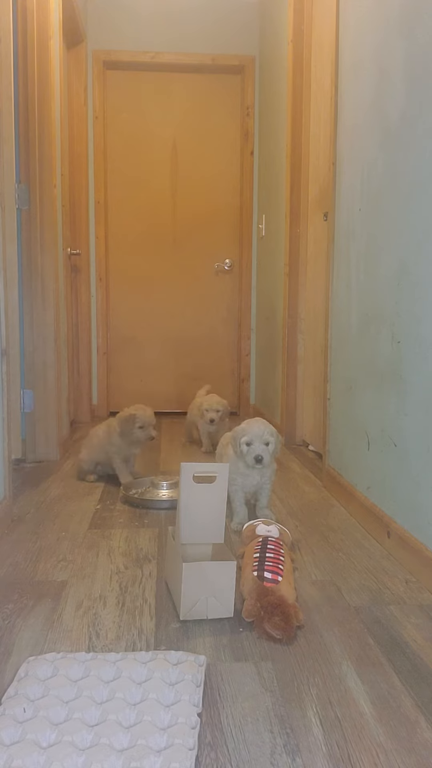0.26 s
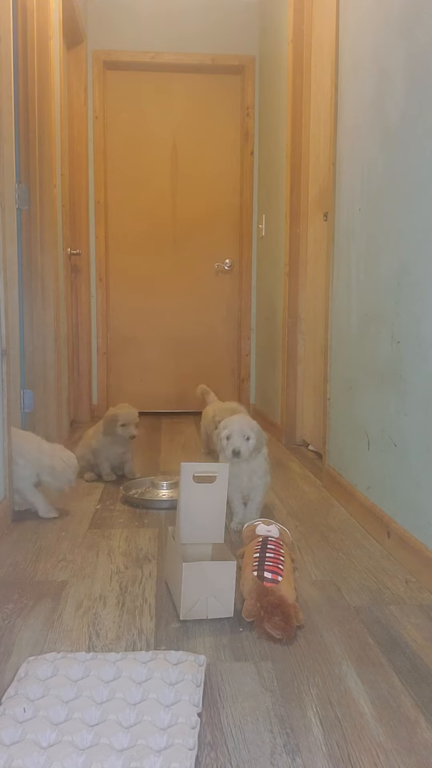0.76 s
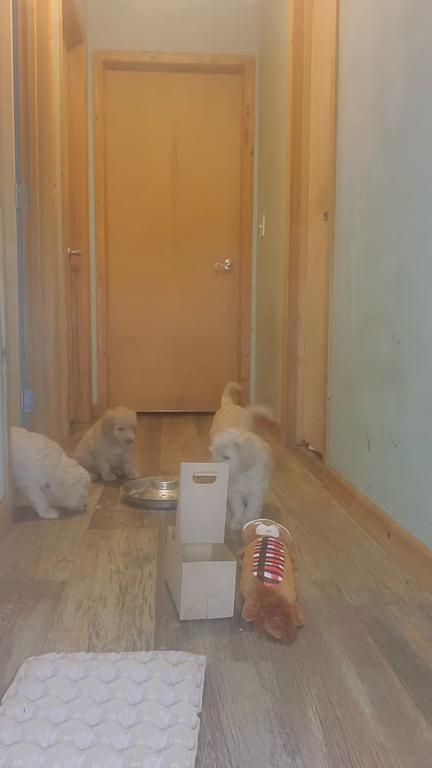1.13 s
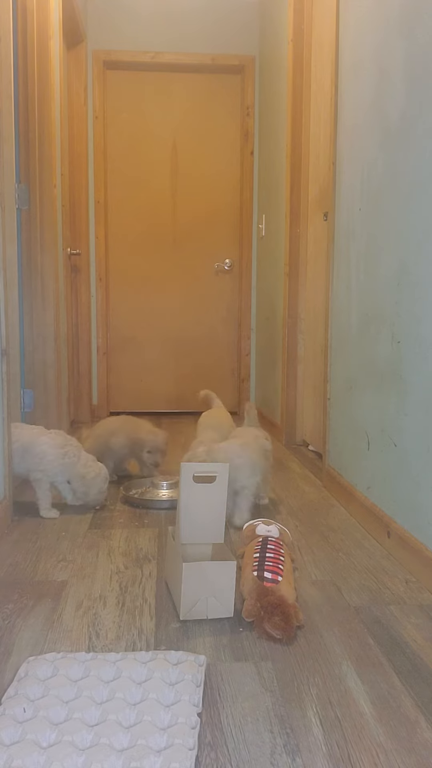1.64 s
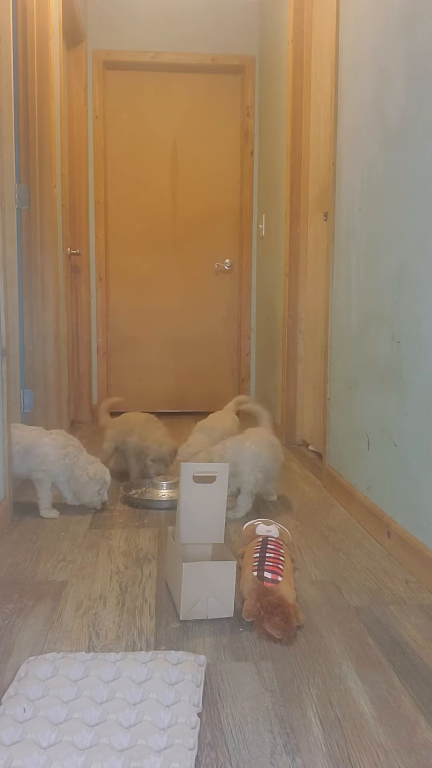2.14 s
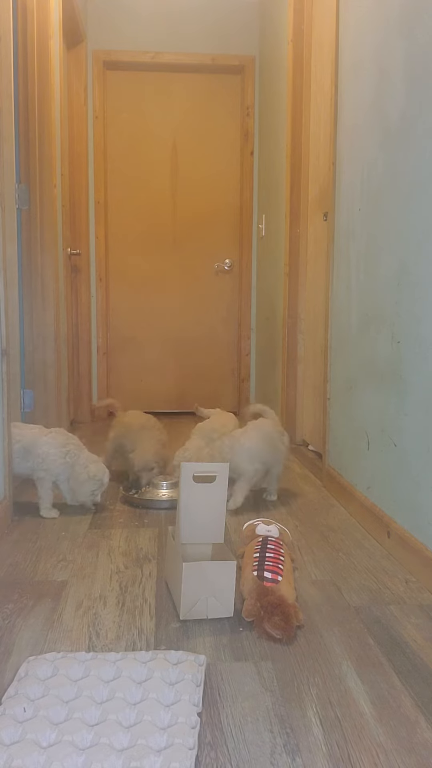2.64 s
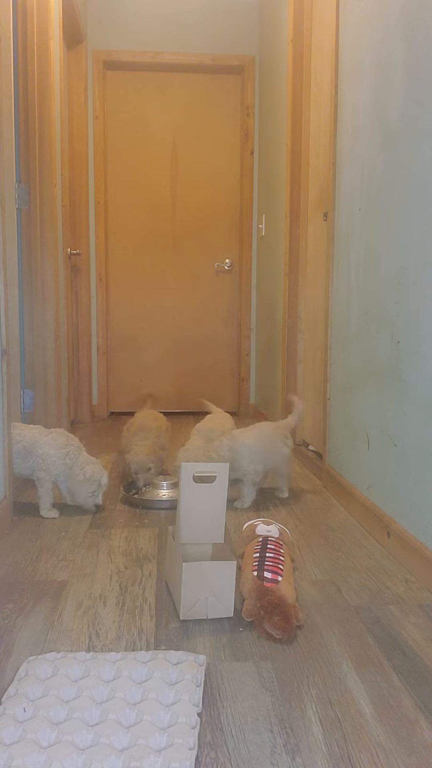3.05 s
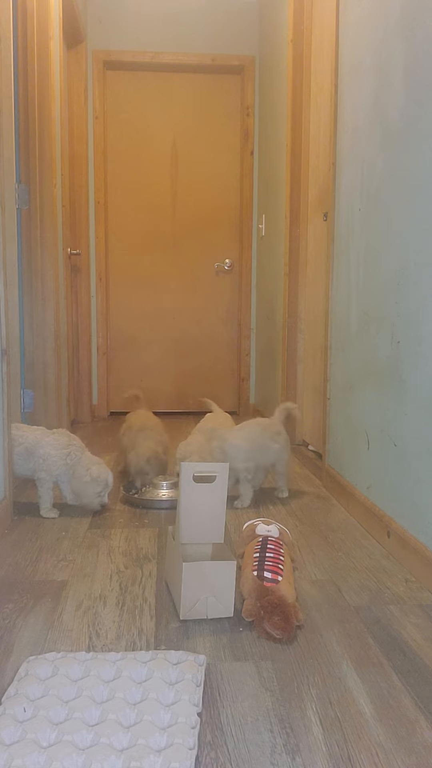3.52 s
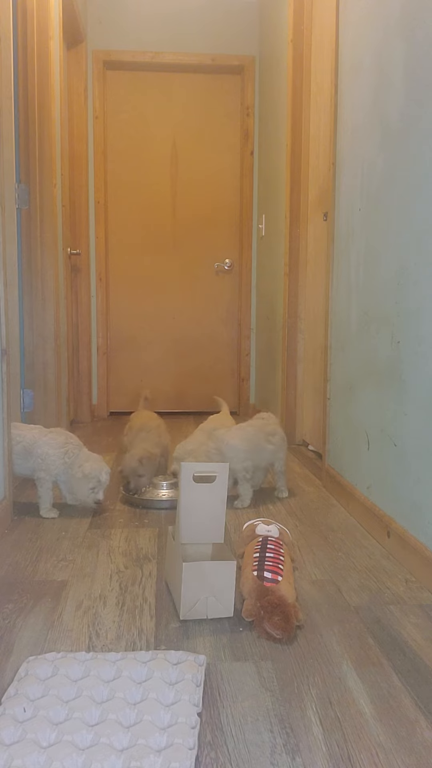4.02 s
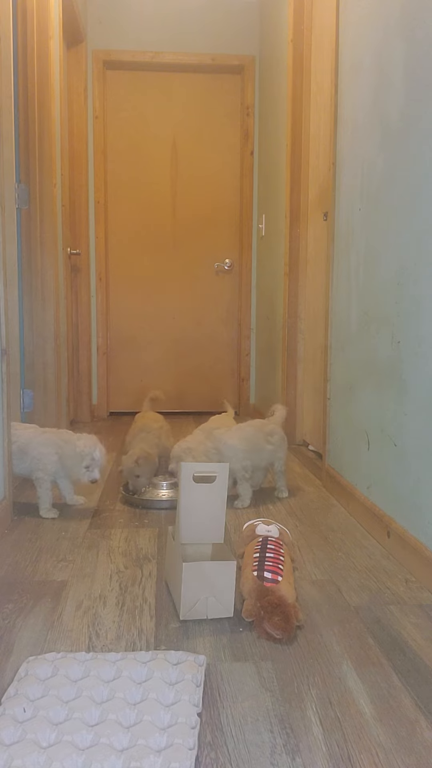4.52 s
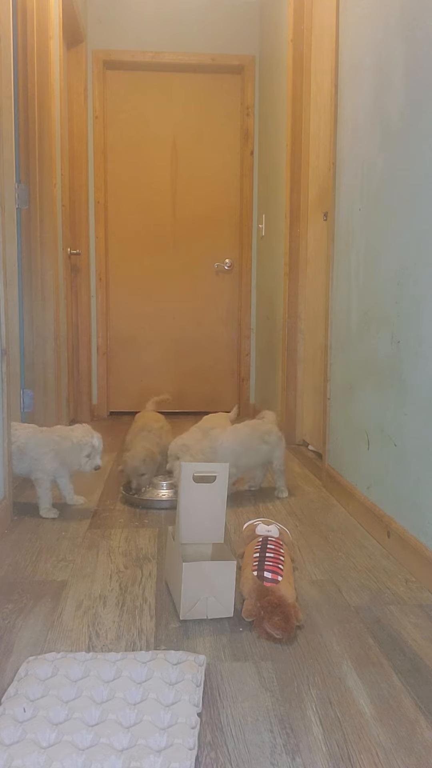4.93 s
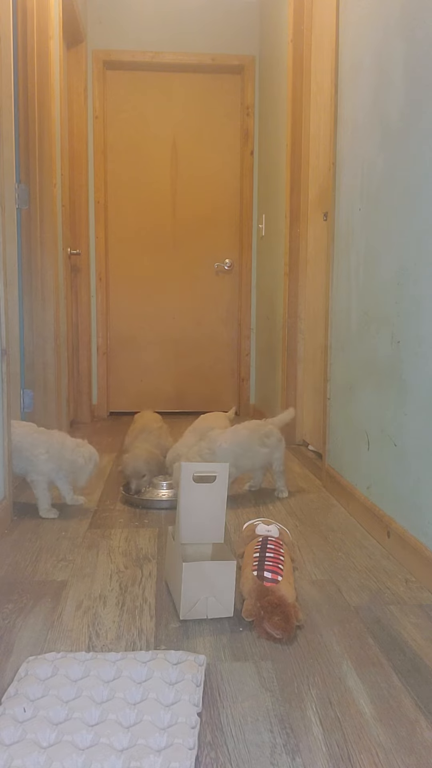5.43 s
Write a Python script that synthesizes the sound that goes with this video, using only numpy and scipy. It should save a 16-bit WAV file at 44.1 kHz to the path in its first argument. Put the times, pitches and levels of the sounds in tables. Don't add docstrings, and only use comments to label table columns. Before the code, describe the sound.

Indoors in a bare hallway, a low hum pulses slowly under soft paw brushing and tiny claw ticks. About a second in, one puppy gives a short, hollow bark with a brief echo. Kibble cracks follow, sparse at first, then denser and louder past four seconds with sharp clinks from a steel bowl. A stereo microphone stands close to the floor and the eating.

```python
import sys
import numpy as np
from scipy import signal
from scipy.fft import rfft, irfft
from scipy.io import wavfile

SR = 44100
rng = np.random.default_rng(int(sys.argv[2]) if len(sys.argv) > 2 else 0)


def transcribe(signal):
    frames = np.atleast_2d(signal).T
    limited = np.clip(frames, -1, 1)
    pcm = np.round(limited * 32767).astype(np.int16)
    wavfile.write(sys.argv[1], SR, pcm)


def convert_level_to_amplitude(level_db):
    exponent = np.asarray(level_db, float) / 20
    return 10 ** exponent


N = 250047

# start in seconds, bite level in dB,
# hardness in dB (crackle), weight in dB (knock and thud).
KIBBLE = [(2.4941, -36.5, -25.5, -9.5), (2.5749, -28.5, -14, -14.5), (2.592, -35, -14, -21),
          (3.2543, -41.5, -13.5, -5.5), (3.2847, -43, -10, -5), (3.3229, -17.5, -26.5, -19.5),
          (4.0893, -34.5, -28, -13.5), (4.1658, -7, -13, -25), (4.1713, -24.5, -18, -21),
          (4.3877, -10.5, -8.5, -17.5), (4.3914, -24, -9, -9), (4.5414, -27, -17, -10),
          (4.7059, -20.5, 0, -27.5), (4.8676, -36, -14.5, -20), (4.9294, -36.5, -20, -22),
          (5.077, -35.5, -21, -12.5), (5.248, -29, -17, -13), (5.29, -40.5, -23, -25),
          (5.32, -42.5, -20, -26), (5.4443, -12.5, -21, -19), (5.456, -21.5, -11, -28)]


def rms_one(x):
    return x / np.sqrt(np.mean(x ** 2) + 1e-20)


def at_hz(points, hz):
    point_hz, value = np.transpose(points)
    return np.interp(np.log(hz), np.log(point_hz + 1e-9), value)


def band(x, low_hz, high_hz):
    sos = signal.butter(2, [low_hz, high_hz], "band", fs=SR, output="sos")
    return signal.sosfilt(sos, x + 1e-18)


def resonate(x, hz, width_hz):
    r = np.exp(-np.pi * width_hz / SR)
    poles = [1, -2 * r * np.cos(2 * np.pi * hz / SR), r * r]
    return signal.lfilter([(1 - r * r) / 2, 0, (r * r - 1) / 2], poles, x + 1e-18)


def diffuse(spectrum, count):
    # frequency in Hz, side minus mid in dB.
    pair_width = [(60, -25.5), (150, -12), (380, 1.5), (950, 6.5), (2380, 0), (5980, 0.5), (15000, 0)]
    hz = np.maximum(np.arange(count // 2 + 1) * SR / count, 10)
    mid, side = rfft(rng.standard_normal((2, count))) * convert_level_to_amplitude(at_hz(spectrum, hz))
    side = side * convert_level_to_amplitude(at_hz(pair_width, hz))
    mid_rms = np.sqrt(np.sum(abs(mid[hz > 200]) ** 2) * 2) / count
    return irfft(np.array([mid + side, mid - side]) / mid_rms, count)


def pulse(spectrum):
    hz = np.maximum(np.arange(513) * SR / 1024, 10)
    cepstrum = irfft(np.log(convert_level_to_amplitude(at_hz(spectrum, hz))))
    cepstrum[1:512] *= 2
    cepstrum[513:] = 0
    return irfft(np.exp(rfft(cepstrum)))


def building():
    # frequency in Hz, density in dB per Hz.
    air_spectrum = [(18, -37.5), (30, -22), (71, -8), (215, -22.5), (328, -21), (584, -18.5), (780, -26),
                    (988, -22), (1130, -27), (1280, -27), (4080, -39), (6050, -53.5), (8300, -67.5),
                    (10800, -59.5), (16000, -54.5)]
    # frequency in Hz, width in Hz, level in dB.
    duct_drones = [(121.45, 6.1, -59.5), (183.2, 16, -67.5), (580, 3.8, -60.5), (1338, 3.7, -70)]
    hum_hz, hum_db, second_motor_db = 60, -48.5, -10
    beat_s, beat_dip_s = 0.782, 0.07
    s = np.arange(N) / SR
    air = convert_level_to_amplitude(-58.5) * diffuse(air_spectrum, count=N)
    white = diffuse([(100, 0), (16000, 0)], count=N)
    drones = 0
    for hz, width_hz, db in duct_drones:
        drone = resonate(resonate(white, hz, width_hz), hz, width_hz)
        drones = drones + convert_level_to_amplitude(db) * rms_one(drone)
    turn = 2 * np.pi * hum_hz * s
    slip = 2 * np.pi * (s - beat_dip_s) / beat_s
    hum = np.sin(turn) - convert_level_to_amplitude(second_motor_db) * np.sin(turn + slip)
    hum_sides_db = hum_db + np.array([[-0.3], [0.3]])
    return air + drones + np.sqrt(2) * convert_level_to_amplitude(hum_sides_db) * hum


def shuffle():
    # start in seconds, level in dB, time held in seconds.
    strokes = [
        (0, -45.5, 0.015),
        (.33, -54.5, .005),
        (0.386, -56, 0.0046),
        (.81, -57.5, 0.011),
        (.87, -57, 0.0082),
        (3.27, -56, .01),
        (4.03, -54, .01),
        (4.1, -76, .8),
        (5.25, -63, 0.064),
        (5.5, -63, .2),
    ]
    rise_db_per_s, fall_db_per_s, floor_db = 400, 346, -80
    swell_db, swell_db_per_s = -16, 1305
    s = np.arange(N) / SR
    level_db = np.full(N, float(floor_db))
    for start, db, held in strokes:
        early, late = np.maximum(start - s, 0), np.maximum(s - start - held, 0)
        level_db = np.maximum(level_db, db - rise_db_per_s * early - fall_db_per_s * late)
    for start, bite_db, hard_db, _ in KIBBLE:
        swell = bite_db + hard_db / 2 + swell_db - swell_db_per_s * abs(s - start)
        level_db = np.maximum(level_db, swell)
    colour = [(500, -4.5), (2500, 13), (6000, 5), (9000, -10.5), (15000, 0)]   # Hz, dB
    return convert_level_to_amplitude(level_db - 11.0) * diffuse(colour, count=N)


def ticks():
    # start in seconds, peak level in dB, pitch in Hz.
    claw_taps = [(0.1705, -68, 1620), (0.3206, -48, 1790), (0.852, -45.5, 2400), (0.9702, -53.5, 2740),
                 (1.9187, -44, 2760), (1.984, -43.5, 1800), (2.0404, -50, 1870), (2.1147, -47, 2994),
                 (2.1155, -47, 2080), (2.022, -49.5, 3240), (2.2443, -53, 1700), (2.455, -52, 2720),
                 (2.5412, -41, 3030), (2.834, -56, 1700), (3.015, -46.5, 2040), (3.1368, -56, 1707),
                 (3.5618, -44, 1590), (3.7243, -53, 1820), (3.9894, -44, 2170), (5.6562, -47, 2110)]
    out, click = np.zeros(N + 400), np.eye(1, 400)[0]
    for start, db, hz in claw_taps:
        tone = resonate(resonate(click, hz, 0.16 * hz), hz, 0.3 * hz)
        tone = tone + 0.002 * band(click, 600, 5000)
        out[round(start * SR):][:400] += convert_level_to_amplitude(db + 3.5) * tone / abs(tone).max()
    return out[:N]


def hollow(x):
    return x - 0.9 * resonate(x, 4400, 1800)


def bark():
    # time in seconds, pitch in Hz, effort in dB.
    course = [
        (1.1, 326.5, -80.5),
        (1.135, 352, -58),
        (1.155, 383, -46),
        (1.185, 392.8, -36),
        (1.203, 413, -30),
        (1.239, 418.1, -31.5),
        (1.268, 406.1, -35),
        (1.3, 417.7, -42.5),
        (1.359, 424.9, -74),
    ]
    # frequency in Hz, width in Hz, level in dB.
    throat = [(800, 596, -1), (1167, 400, 3), (1700, 220, -7), (2260, 665, -12.5), (3065, 170, -44),
              (5470, 500, -29)]
    chest_db, chest_gain_db, chest_fade_db_per_s = 7.5, 10, 167
    chest_opens_s, chest_rise_s = 1.188, 0.014
    growl_db, growl_left = 19, 0.3
    s, course_hz, course_db = np.transpose(course)
    now = np.arange(N) / SR
    pitch_hz = np.interp(now, s, course_hz)
    effort_db = np.interp(now, s, course_db, left=-120, right=-120)
    opened = np.clip((now - chest_opens_s) / chest_rise_s, 0, 1)

    fade_db = chest_fade_db_per_s * now
    driven_db = effort_db + chest_db + chest_gain_db * opened
    pure_db = np.maximum.accumulate(driven_db + fade_db) - fade_db
    wobble = 1 + 0.008 * rms_one(band(rng.standard_normal(N), 25, 150))
    turn = 2 * np.pi * np.cumsum(pitch_hz * wobble) / SR
    pure = np.sqrt(2) * convert_level_to_amplitude(pure_db) * np.sin(turn)

    buzz = sum(np.cos(k * turn) for k in range(2, 17))
    shimmer = convert_level_to_amplitude(2 * rms_one(band(rng.standard_normal(N), 30, 220)))
    source = convert_level_to_amplitude(effort_db) * shimmer * buzz
    shaped = 0
    for k, (hz, width_hz, db) in enumerate(throat):
        formant = resonate(resonate(source, hz, width_hz), hz, 2 * width_hz)
        shaped = shaped + convert_level_to_amplitude(db) * formant * (-1) ** k

    breath = rng.standard_normal(N) * (1 + 0.8 * np.cos(turn))
    breath_db = np.minimum(effort_db + 2.5, -41)
    upper_rasp = band(band(breath, 1500, 3500), 2000, 3200)
    rasp = convert_level_to_amplitude(breath_db + 11.5) * (band(breath, 600, 1130) + convert_level_to_amplitude(-16) * upper_rasp)
    growl_share = 1 - (1 - growl_left) * opened
    growl = convert_level_to_amplitude(breath_db + growl_db) * growl_share * band(breath, 213, 383)
    return pure + growl, hollow(shaped + rasp)


def cracks():
    # low edge in Hz, high edge in Hz.
    crack_bands = [(1500, 4000), (300, 500), (500, 1500), (4000, 7000), (9000, 14000)]
    splinters, splinter_s, splinter_fade_db = 7, 0.006, 7
    thud_db, fizz_db, fizz_per_hardness = -10, 8.5, 2.01
    trim_db = np.array([4.0, 7.0, 13.5, 8.5, -4.5])
    edges = np.array(crack_bands)
    centres = np.sqrt(edges.prod(axis=1))
    spread_db = 20 * np.log10(np.diff(edges)[:, 0] * 2 / SR)
    order = np.argsort(centres)
    draws = rng.random((len(KIBBLE), 3, splinters))
    out, sent = np.zeros(N + 2000), np.zeros(N + 2000)
    for (start, bite_db, hard_db, weight_db), (when, size, sign) in zip(KIBBLE, draws):
        at, burst = round(start * SR), np.zeros(500)
        when = np.sort(when) - when.min()
        splinter = convert_level_to_amplitude(-9 * size - splinter_fade_db * when) * np.sign(sign - 0.5)
        burst[(SR * splinter_s * when).astype(int)] = splinter
        burst = burst / np.sqrt(np.sum(burst ** 2))
        fizz = fizz_db + fizz_per_hardness * hard_db
        levels_db = bite_db + np.array([0, weight_db + thud_db, weight_db, hard_db, fizz])
        click = pulse(np.transpose([centres, levels_db - spread_db + trim_db])[order])
        out[at:at + 1523] += np.convolve(click, burst)
        sent[at:at + 1024] += click
    thin = signal.butter(4, 290, "high", fs=SR, output="sos")
    return signal.sosfilt(thin, [out, sent + 0.51 * out])[:, :N]


def bowl():
    # start in seconds, mode in Hz, level in dB.
    knocks = [(2.5748, 3850, -29), (2.594, 4000, -31), (2.5752, 2080, -28), (3.151, 430, -47),
              (3.276, 360, -37), (3.3246, 1710, -30), (4.0917, 365, -40.5), (3.7, 1940, -35),
              (4.1652, 352, -22), (4.1655, 2600, -11), (4.1665, 2000, -20), (4.3886, 336, -20.5),
              (4.3885, 3450, -13), (4.5417, 900, -36), (4.7062, 4370, -13.5), (4.7071, 3190, -20.5),
              (4.7065, 6500, -15), (5.2484, 3000, -32), (5.4446, 690, -41), (5.46, 380, -35.5)]
    belly_hz, belly_t60_s, choke = 366, 0.19, 1.24
    out, s = np.zeros(N + SR // 2), np.arange(SR // 2) / SR
    for start, hz, db in knocks:
        t60_s = belly_t60_s * (belly_hz / hz) ** choke
        onset = np.minimum(s * hz, 1)
        ring = convert_level_to_amplitude(db - 60 * s / t60_s) * np.sin(2 * np.pi * hz * s) * onset
        out[round(start * SR):][:SR // 2] += ring
    return out[:N]


def hall_tail(stretch):
    # frequency in Hz, time to fall 60 dB in seconds.
    hall_t60 = [(200, 0.22), (400, 0.45), (1000, 0.43), (2500, 0.39), (6000, 0.38), (12000, 0.26)]
    # frequency in Hz, left minus right in dB.
    tail_lean = [(60, 35), (240, 8.5), (950, -1), (3770, 7), (15000, 14.5)]
    s = np.arange(SR * 3 // 4) / SR
    edges = 100 * 2 ** np.arange(0, 7.6, 0.5)
    noise = diffuse([(100, 0), (16000, 0)], count=len(s))
    grain = rms_one(band(rng.standard_normal(len(s)), 40, 400))
    noise = noise * convert_level_to_amplitude(5 * np.exp(-s / 0.06) * grain)
    tail = 0
    for k, (low, high) in enumerate(zip(edges, edges[1:])):
        hz = np.sqrt(low * high)
        lean = convert_level_to_amplitude(at_hz(tail_lean, hz) / 2 * np.array([[1], [-1]]))
        decay = convert_level_to_amplitude(-60 * s / at_hz(hall_t60, hz) / stretch)
        tail = tail + lean * band(noise, low, high) * decay * (-1) ** k
    return tail * (1 - np.exp(-s / 0.005))


def hall(dry, sent, tail, wet_db, pan_db, flip_hz):
    # delay in seconds, level in dB.
    echoes = [
        (.0065, -10),
        (.013, -14),
        (.0235, -15),
    ]
    early = np.zeros((2, SR // 20))
    early[:, 0] = 1
    for k, (late, echo_db) in enumerate(echoes):
        at = round(late * SR)
        early[0, at] = convert_level_to_amplitude(echo_db)
        early[1, at + 18 * (-1) ** k] = convert_level_to_amplitude(echo_db)
    pole = np.exp(-2 * np.pi * flip_hz / SR)
    early[1] = signal.lfilter([0, 0, -pole, 1], [1, -pole], early[1])
    body_shade = pulse([(2000, 0), (6000, -4), (15000, -7)])
    early[1] = np.convolve(early[1], body_shade)[:SR // 20]
    early *= convert_level_to_amplitude([[pan_db / 2], [-pan_db / 2]])
    straight = signal.oaconvolve(early, dry[None], axes=1)[:, :N]
    wet = signal.fftconvolve(tail, sent[None], axes=1)[:, :N]
    return straight + convert_level_to_amplitude(wet_db) * wet


def scene():
    background = building() + shuffle()
    pure, rough = bark()
    from_dog, from_floor = hall_tail(stretch=1.607), hall_tail(stretch=0.91)
    voice = hall(pure, pure, from_dog, wet_db=-51, pan_db=7, flip_hz=8000)
    voice += hall(rough, rough, from_dog, wet_db=-30.5, pan_db=2.5, flip_hz=300)
    claws = ticks() * np.array([[1], [0.5]])
    steel = bowl() * np.array([[1], [0.45]])
    straight, sent = cracks() + claws + steel
    near = hall(straight, sent, from_floor, wet_db=-35.5, pan_db=2.5, flip_hz=320)
    return background + voice + near


def low_pass(x):
    return signal.sosfilt(signal.butter(12, 16630, fs=SR, output="sos"), x)


def record(dry):
    housed = dry - 0.95 * resonate(dry, 8250, 4000)
    housed = housed + 1.43 * resonate(housed, 10820, 3000)
    top_cut = signal.cheby2(10, 50, 16200, fs=SR, output="sos")
    return low_pass(signal.sosfilt(top_cut, housed))


dry = scene()
out = record(dry)
transcribe(out)
```